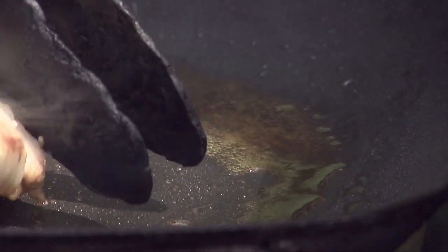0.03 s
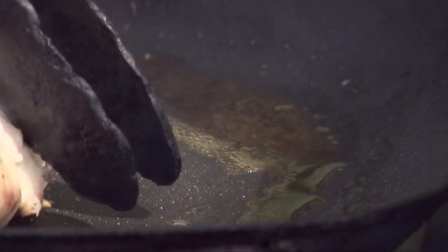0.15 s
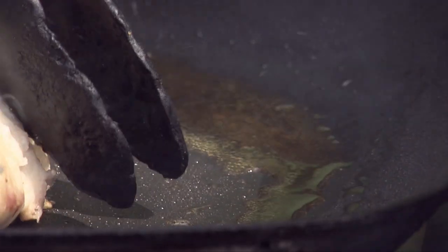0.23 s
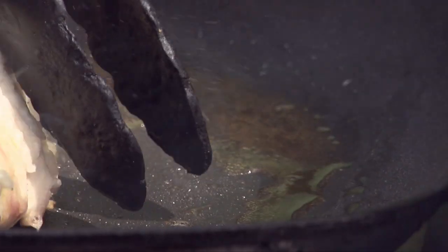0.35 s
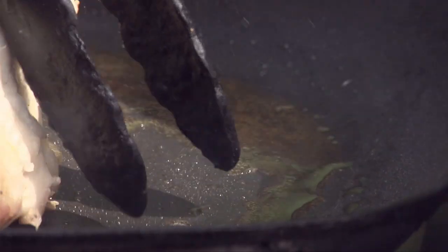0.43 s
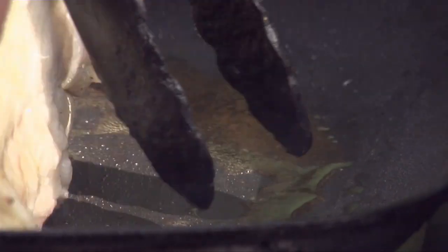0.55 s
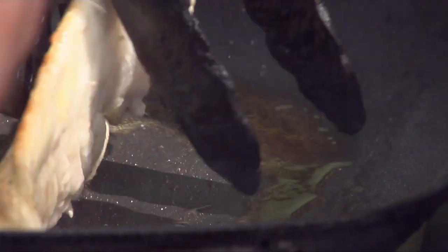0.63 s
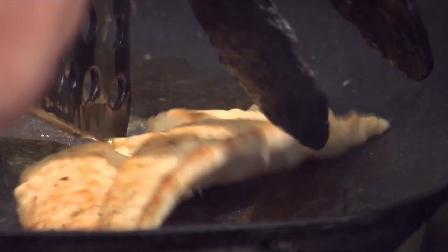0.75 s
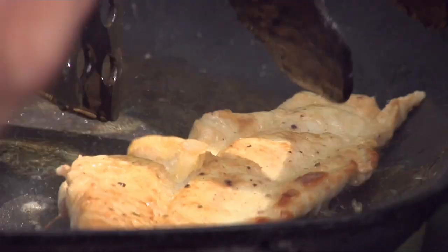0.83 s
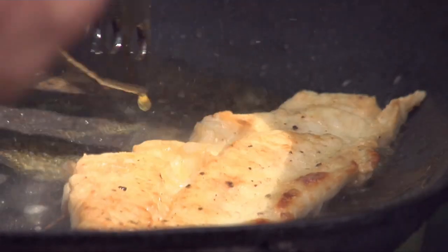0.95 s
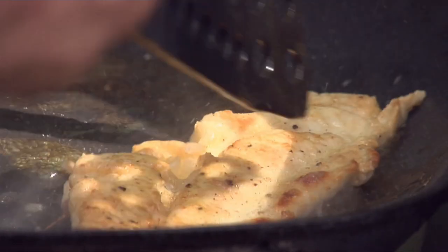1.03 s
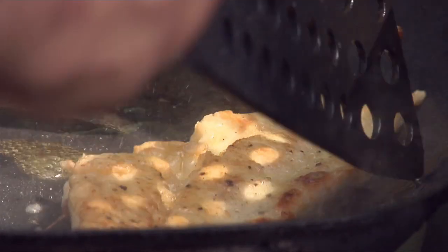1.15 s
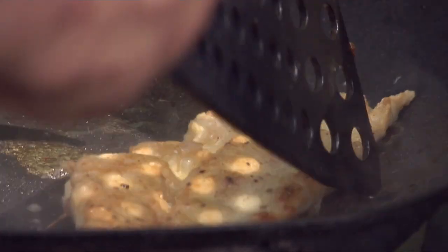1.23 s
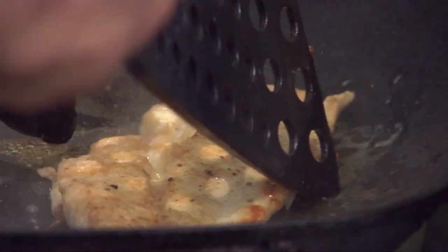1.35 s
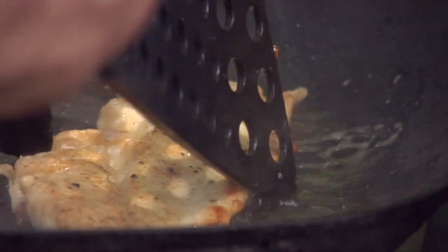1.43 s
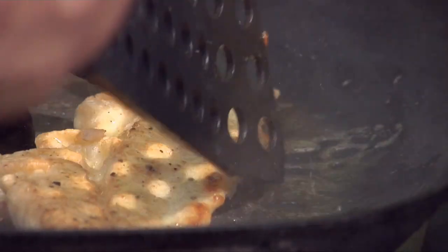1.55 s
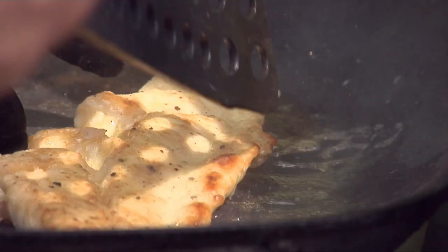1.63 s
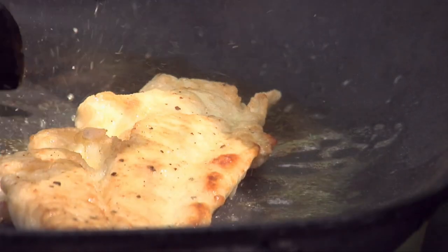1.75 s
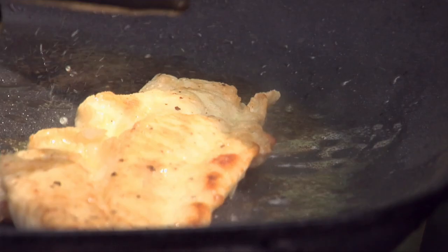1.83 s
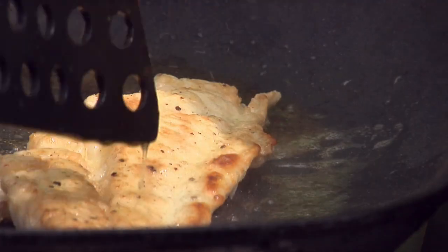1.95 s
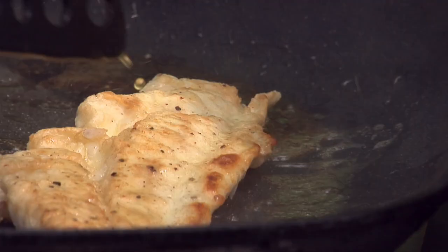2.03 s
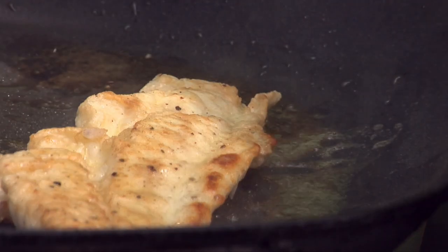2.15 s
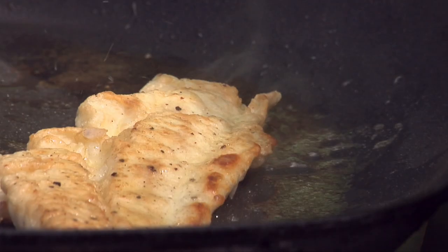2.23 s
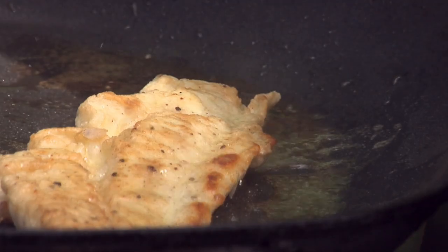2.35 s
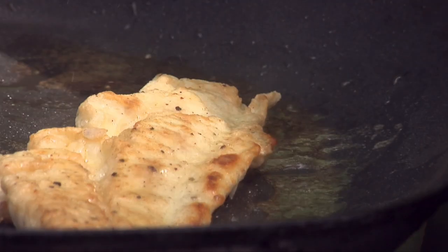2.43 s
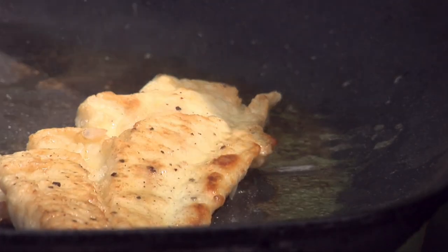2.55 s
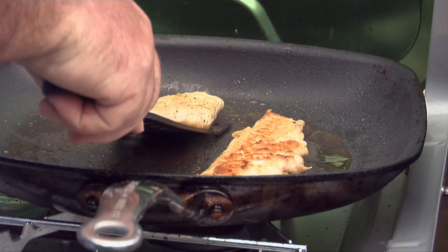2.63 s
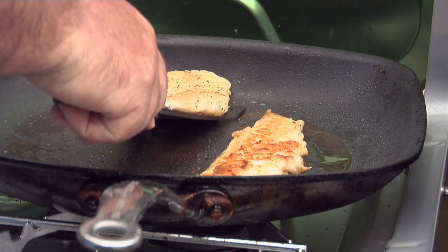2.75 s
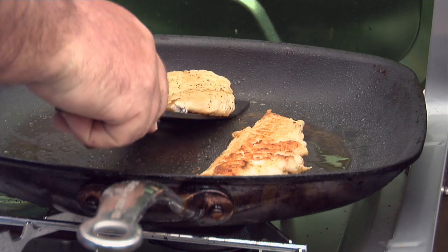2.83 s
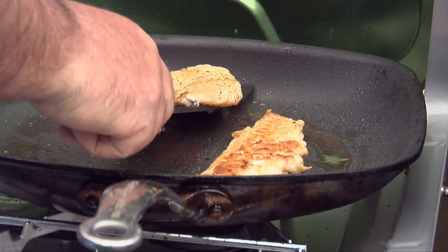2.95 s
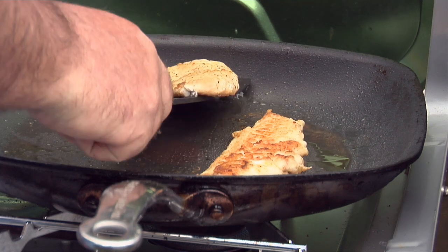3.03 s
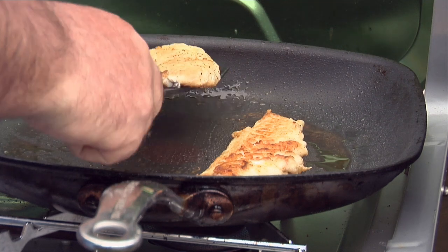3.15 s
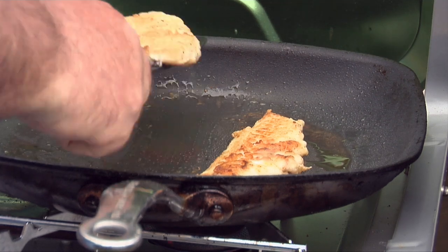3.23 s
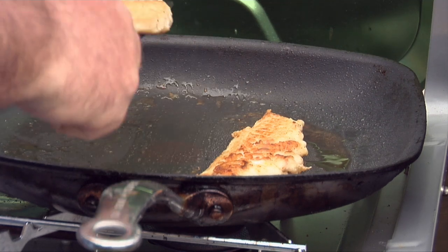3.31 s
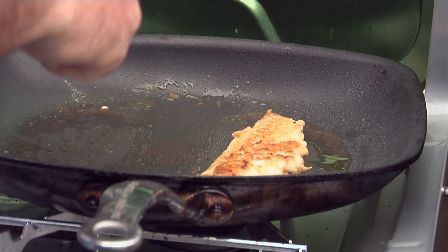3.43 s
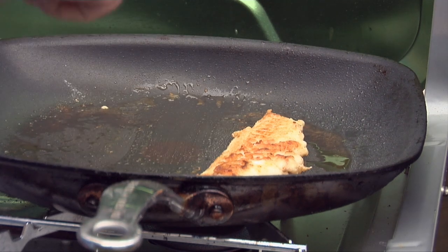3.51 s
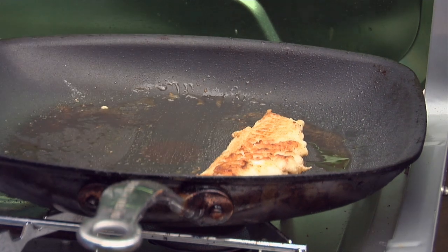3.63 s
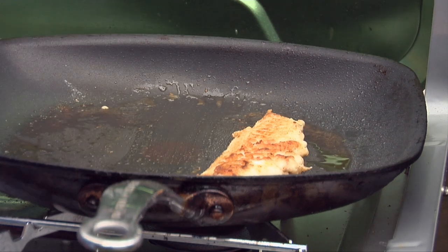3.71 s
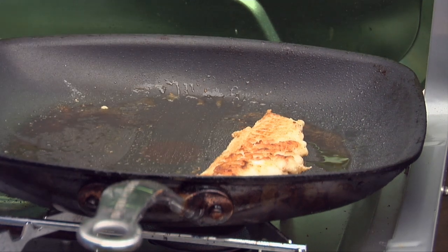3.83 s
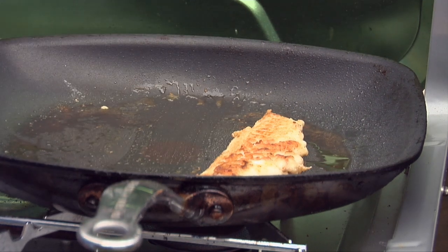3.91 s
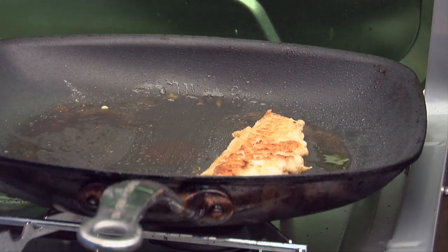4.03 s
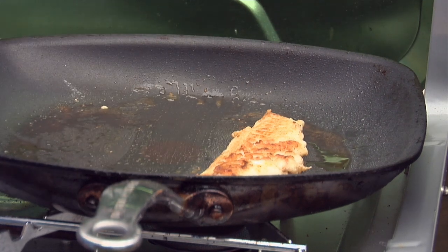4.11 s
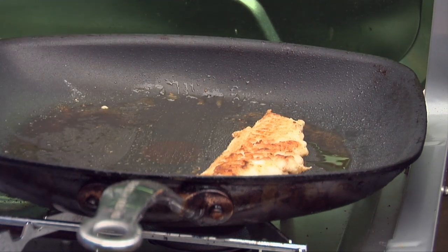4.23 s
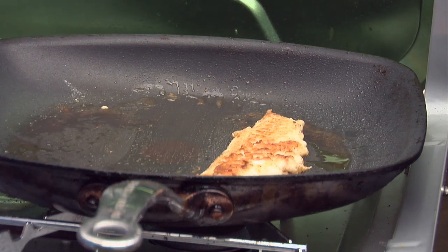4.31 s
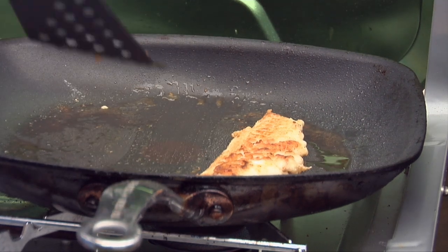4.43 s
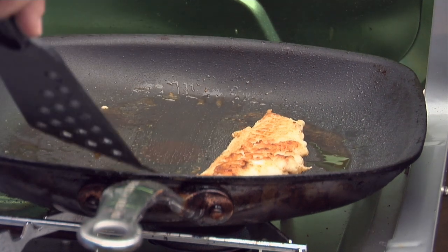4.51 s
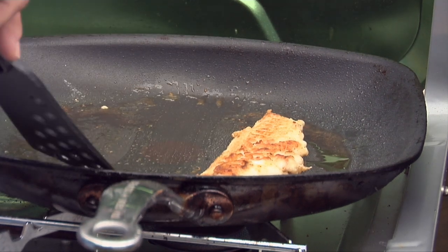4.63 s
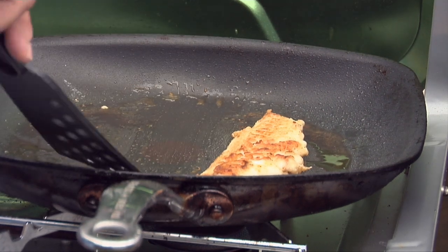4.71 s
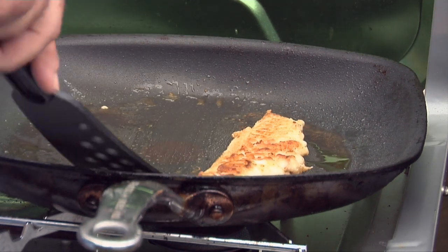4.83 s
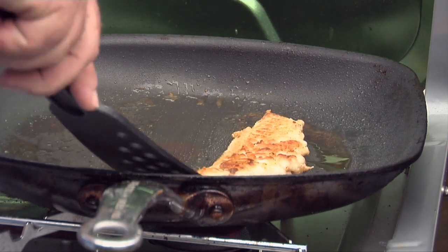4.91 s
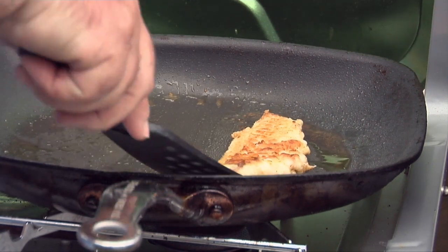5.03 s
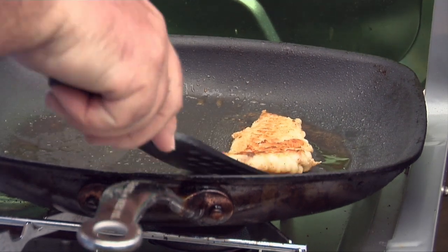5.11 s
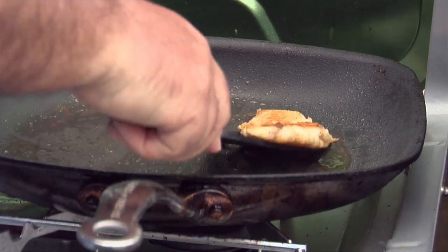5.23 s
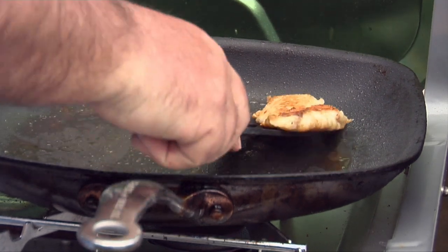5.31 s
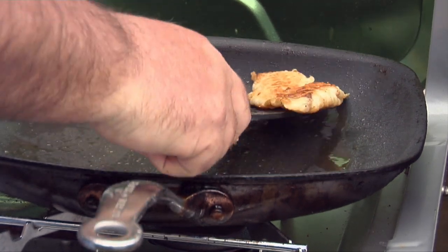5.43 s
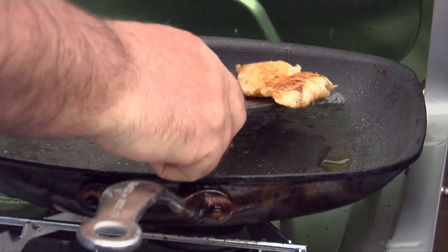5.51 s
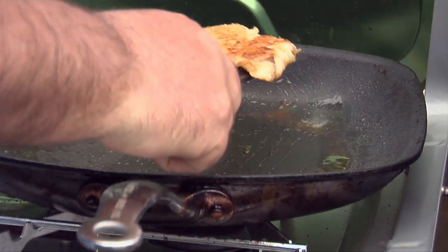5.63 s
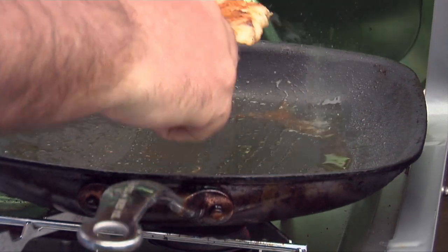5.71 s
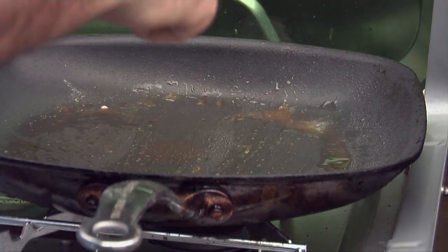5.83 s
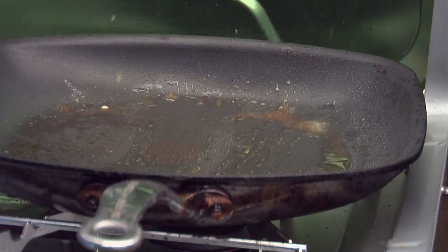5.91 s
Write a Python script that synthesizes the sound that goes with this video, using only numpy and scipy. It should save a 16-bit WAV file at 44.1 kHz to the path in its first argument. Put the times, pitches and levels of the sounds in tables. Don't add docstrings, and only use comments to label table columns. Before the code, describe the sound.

Close to a frying pan outdoors, thin sizzle and sharp pops swell within a second into a dense bright rush as fish meets hot fat, with thin steam whistles. At about 2.6 seconds the view jumps back: the burner is softer, and the sizzle thins into many separate snaps and ticks. Muffled traffic and low wind rumble sit behind. Loud pops briefly duck everything.

```python
import sys
import numpy as np
from scipy import signal
from scipy.fft import rfft, irfft, next_fast_len
from scipy.io import wavfile
from scipy.ndimage import uniform_filter1d, map_coordinates

SR = 44100
rng = np.random.default_rng(int(sys.argv[2]) if len(sys.argv) > 2 else 0)


def makeup_ratio(level_db):
    decades = np.asarray(level_db, float) / 20
    return 10 ** decades


def master(y):
    cut = np.clip(np.atleast_2d(y).T, -1, 1)
    pcm = np.round(cut * 32767)
    wavfile.write(sys.argv[1], SR, pcm.astype(np.int16))


N = 263277

# time in seconds, vigour in dB, brightness in dB.
FRYING = [(0, -37, -5), (0.2, -34.5, -6.5), (0.5, -30.5, -3.5), (0.7, -34, -3), (0.81, -32, -2),
          (1.0, -23.5, -5), (1.2, -24.5, -4.5), (1.8, -22.5, -6), (2.05, -25, -3), (2.35, -28, -6),
          (2.8, -26, -7.5), (3.08, -28.5, -5.5), (3.3, -31.5, -5.5), (4.1, -35, -3.5), (4.7, -33.5, -5),
          (5.25, -32, -4.5), (5.56, -31.5, -4), (5.97, -31, 1.5)]
# start in seconds, rise in dB,
# hold in seconds.
FLARES = [(0.285, 4, .06), (0.815, 5.5, .07), (2.43, 3, .13), (2.635, 3, .05), (2.86, 3, .16),
          (4.72, 3, .05), (4.86, 2.5, .03), (4.99, 2.5, .15), (5.265, 2.5, .09), (5.57, 6.5, .11),
          (5.84, 2.5, .1)]
# frequency in Hz, level in dB per Hz.
FIZZ_SPECTRUM = [(760, -27), (1300, -8), (1620, -3.5), (2210, -3.5), (2810, -5), (4720, 0), (6250, -0.5),
                 (6930, 1), (8270, -2), (12800, -4.5), (14500, -10), (15700, -10)]


def sizzle():
    vigour_db, bright_db = curves(FRYING)
    for start, rise_db, hold in FLARES:
        vigour_db = vigour_db + ramps(start, rise_db, attack=.015, hold=hold, release=.07)
    full_boil_db, share_per_db = -24, .03
    share = 0.2 + share_per_db * (full_boil_db - vigour_db) + 0.22 * far()
    share = np.clip(share, .05, .9)

    sway_db, far_fat_db = .6, -4.5
    fizz_db = vigour_db + far() * (far_fat_db + sway_db * wobble(8))
    spit_db = fizz_db + bright_db + sway_db * wobble(12)

    bed = patchy(1.6) * makeup_ratio(0.12 * wobble(24.95))
    crackle = grains(count=8000, centre_hz=8500, spread=0.47, cycles=1.2, scatter_db=7.0, clump=.35)
    ringing = grains(count=3000, centre_hz=5580, spread=0.306, cycles=10, scatter_db=5.5, clump=.4)
    bursts = unit(pan(crackle + 0.2 * ringing))
    fat = coloured(np.sqrt(1 - share) * unit(bed) + np.sqrt(share) * bursts, FIZZ_SPECTRUM)

    low = filtered(fat, lambda hz: 1 / (1 + (hz / 8000) ** 6))
    return makeup_ratio(fizz_db - 2.2) * unit(low) + makeup_ratio(spit_db + 1.33) * unit(fat - low)


def grains(count, centre_hz, spread, cycles, scatter_db, clump):
    u, t = rng.random((count, 2)), np.arange(160) / SR
    arrival = np.cumsum(np.exp(clump * (wobble(40) + wobble(150))))
    s = np.interp(u[:, 0], arrival / arrival[-1], np.arange(N) / SR)
    hz = np.clip(centre_hz * np.exp(spread * rng.standard_normal((count, 1))), 2800, 16000)
    size = makeup_ratio(-scatter_db * np.log(u[:, 1:] + .03))
    shapes = size * np.sin(2 * np.pi * hz * t) * np.exp(-t * hz / cycles)

    mean_power = uniform_filter1d(np.mean(abs(rfft(shapes, 512)) ** 2, axis=0), size=9)
    evening = (mean_power + 0.00086 * mean_power.max()) ** -.5
    grid = np.fft.rfftfreq(512, 1 / SR)
    return unit(filtered(place(s, shapes), lambda f: np.interp(f, grid, evening)))


# delay in seconds, level in dB.
PAN_ECHOES = [
    (.0006, -13),
    (.0014, -15),
    (.0023, -15),
    (.0037, -19),
    (.0058, -22),
]


def pan(x):
    echoes = sum(makeup_ratio(db) * np.pad(x, (round(s * SR), 0))[:N] for s, db in PAN_ECHOES)
    return x + echoes


# burst time in seconds, peak in dB, pitch in Hz.
POPS = [(0.4808, -16.5, 9580), (0.5456, -14, 3870), (0.6338, -17, 3840), (0.796, -19, 6740),
        (0.83, -12, 3500), (0.837, -13, 6130), (2.831, -20, 4270), (2.95, -14, 7360), (3.0765, -17.5, 3800),
        (3.1128, -23, 4030), (3.1609, -10.5, 7000), (3.259, -19, 6970), (3.339, -15, 6860),
        (3.458, -19.5, 9670), (3.6466, -18.5, 6540), (3.707, -21, 4700), (3.74, -17, 7780),
        (3.899, -23, 6600), (4.032, -23, 5300), (4.113, -16, 7000), (4.2721, -18, 6660),
        (4.4394, -21, 2600), (4.554, -17, 7320), (4.7633, -21, 4670), (5.274, -17, 3570),
        (5.309, -15, 4400), (5.3566, -20, 4240), (5.443, -16.5, 4260), (5.548, -22, 6310),
        (5.8965, -18.5, 6900)]
# burst time in seconds, pitch in Hz.
SPITS = [(0.173, 5340), (0.767, 7560), (2.5301, 7680), (2.9168, 7640), (3.0002, 5850), (3.037, 4400),
         (3.2954, 6500), (3.6817, 3820), (3.8112, 5000), (3.8534, 3850), (4.0515, 7260), (4.1733, 4250),
         (4.2033, 6830), (4.337, 5830), (4.4275, 5610), (4.4777, 8400), (4.5003, 4030), (4.6723, 5690),
         (4.7042, 4570), (4.7564, 4630), (4.874, 3950), (5.0974, 8800), (5.1602, 7550), (5.255, 4650),
         (5.376, 4340), (5.4066, 4560), (5.473, 3600), (5.5714, 6000), (5.616, 6230), (5.8212, 7150)]


def pops():
    small_pop_db, t60 = -21.5, .014
    small = [(s, small_pop_db, hz) for s, hz in SPITS]
    s, db, hz = np.transpose(list(POPS) + small)[:, :, None]
    t, f = np.arange(1024) / SR, np.fft.rfftfreq(1024, 1 / SR)
    noise = rng.standard_normal((len(s), 2, len(t)))
    swell = (1 - np.exp(-t / 0.0003)) * makeup_ratio(-60 * t / t60)
    spiky = noise[:, 0] * makeup_ratio(6.6 * noise[:, 1])
    splutter = rfft(spiky * swell)
    cavity = resonance(f, hz, 2300) + 0.5 * resonance(f, 6900, 7400)
    shapes = irfft(splutter * cavity / (1 + (f / 12500) ** 4))
    return place(s[:, 0], makeup_ratio(db + 3.5) * shapes / abs(shapes).max(axis=1, keepdims=True))


# time in seconds, peak in dB.
TICKS = [(0.5043, -12), (1.0646, -11), (2.6909, -16), (2.7419, -9), (2.8718, -15), (2.9178, -12),
         (3.0482, -12), (3.1187, -10), (3.2105, -15), (3.2957, -20), (3.4057, -17), (3.5295, -16),
         (3.6234, -13), (3.7772, -16), (3.8534, -17), (3.9879, -17), (4.0523, -19), (4.1552, -18),
         (4.2091, -16), (4.3376, -20), (4.4789, -19), (4.778, -14), (4.7882, -11), (4.8926, -10),
         (5.0987, -15), (5.1617, -16), (5.3776, -15), (5.6265, -10), (5.732, -15), (5.8372, -13)]
DROPLETS = [0.518, 0.582, 0.745, 2.6695, 2.7275, 2.7638, 2.8621, 2.8922, 2.971, 3.0563, 3.3215, 3.4423,
            3.4783, 3.5062, 3.6159, 3.77, 3.8293, 3.8698, 3.9967, 4.2498, 4.3076, 4.3529, 4.41, 4.4651,
            4.634, 4.679, 4.8837, 4.948, 5.176, 5.8793]


def ticks():
    snaps = np.array(POPS)[:, :2] + [.0013, 1]
    middling = [(s, -17.5) for s in DROPLETS]
    small = np.hstack(strays(count=140, level_db=-25.5))
    s, db = np.concatenate([TICKS, snaps, middling, small]).T[:, :, None]
    lead = .0002
    t = np.arange(40) / SR - lead
    hz = 10500 * np.exp(0.14 * rng.standard_normal(s.shape))
    cycle = np.sin(-2 * np.pi * hz * t) * np.exp(-(t * hz / 0.5) ** 2)
    size = makeup_ratio(db + 2.5) / abs(cycle).max(axis=1, keepdims=True)
    return pan(place(s[:, 0] - lead, size * cycle))


def strays(count, level_db):
    start, end = 2.65, 5.95
    u = rng.random((count, 2))
    return start + u[:, :1] * (end - start), level_db + 2.5 * np.log(u[:, 1:] + 0.033)


# start in seconds, peak in dB, pitch in Hz.
BUBBLES = [(0.0246, -23, 7570), (0.1344, -18.5, 4480), (0.2404, -19, 6360), (0.2994, -14, 6350),
           (0.3644, -20, 6780), (0.514, -15, 3340), (0.6075, -13, 3900), (0.7248, -18, 4070),
           (0.7951, -14, 6760), (0.8674, -15, 8900), (0.907, -13, 3470), (3.3446, -4, 2030),
           (3.981, -20, 4040), (3.9947, -24, 3820), (4.1344, -25, 3040), (4.44, -28, 2640),
           (4.5044, -27, 4020)]


def bubbles():
    s, db, hz = np.transpose(BUBBLES)[:, :, None]
    t = np.arange(2600) / SR
    large = hz < 2300
    t60 = np.where(large, .0035, .035)
    hz = np.where(large, 1.15 * hz, hz)
    wander = np.cumsum(0.18 * rng.standard_normal((len(s), len(t))), axis=1)
    ring = np.sin(2 * np.pi * hz * t + wander) * makeup_ratio(-60 * t / t60)
    onset = 1 - np.exp(-t / (0.079 * t60))
    return place(s[:, 0], makeup_ratio(db - 1.0) * ring * onset)


# start in seconds, length in seconds, pitch in Hz, bandwidth in Hz, level in dB.
JETS = [(0.001, .27, 3400, 350, -46), (0.001, .25, 7500, 400, -46), (0.001, .5, 10300, 700, -47),
        (.55, .3, 3760, 600, -43), (.7, .12, 6800, 600, -42), (.755, .08, 13000, 5000, -38),
        (.828, .05, 5500, 1500, -28), (1.1, .85, 7000, 450, -34.5), (1.35, .25, 5000, 300, -43),
        (1.2, .75, 2260, 250, -40), (4.44, .08, 8000, 4000, -41), (4.69, .11, 4650, 180, -42),
        (4.72, .09, 5770, 200, -45), (4.85, .045, 4000, 700, -41), (5.26, .11, 4650, 500, -40),
        (5.26, .12, 3600, 450, -41), (5.6, .12, 4100, 500, -42), (5.42, .32, 1950, 50, -52),
        (5.04, .16, 8000, 3500, -40), (5.58, .16, 8000, 4500, -32), (5.69, .04, 5800, 500, -38)]


def whistles():
    t, out = np.arange(N) / SR, np.zeros(N)
    for start, length, hz, width, db in JETS:
        swell = np.abs(np.sin(np.pi * np.clip((t - start) / length, 0, 1)) ** 0.25)
        hiss = filtered(rng.standard_normal(N), lambda f: resonance(f, hz, width) ** 2)
        out += makeup_ratio(db + 0.9 + 1.6 * wobble(35)) * swell * unit(hiss)
    return out


# time in seconds, level in dB.
BURNER = [(0, -27.5), (.45, -27.5), (1, -33.5), (1.9, -31), (2.15, -33), (2.6, -29), (2.78, -34.5),
          (3, -30.5), (3.9, -30.5), (4.6, -27), (5.1, -29), (5.6, -30), (5.97, -31)]
# frequency in Hz, level in dB per Hz.
FLAME_SPECTRUM = [(35, -65), (60, -32.5), (160, -11), (213, -1), (237, -1), (290, 0.5), (380, -11),
                  (465, -4), (660, -19.5), (715, -23), (988, -14), (1310, -22), (1500, -52), (1950, -58),
                  (3300, -120)]


def burner():
    far_burner_db = -12
    level_db = curves(BURNER)[0] + far_burner_db * far()
    return makeup_ratio(level_db + 1.8 + 0.9 * wobble(12)) * coloured(patchy(0.7), FLAME_SPECTRUM)


# nearest moment in seconds, rise in dB, half width in seconds.
PASSES = [
    (0.3, 3.5, 0.31),
    (1.7, 2.5, 0.29),
    (2.92, 5, 0.091),
    (4.4, 5, 0.64),
    (5.5, 2.5, 0.16),
]
# frequency in Hz, level in dB per Hz.
TRAFFIC_SPECTRUM = [(53, -49), (90, -13), (151, -3), (226, -3), (284, -1), (416, -2.5), (659, 1), (712, 3),
                    (1840, -5.5), (2180, -8), (3500, -12), (4550, -12), (7700, -120)]


def traffic():
    level_db = -40 + swells(PASSES)
    return makeup_ratio(level_db + 4.0 + 0.84 * wobble(12)) * coloured(patchy(0.63), TRAFFIC_SPECTRUM)


# centre in seconds, rise in dB, half width in seconds.
GUSTS = [
    (0, 30, .06),
    (1.71, 6, .1),
    (2.95, 24, 0.39),
    (3.7, 20.5, 0.33),
    (4.33, 25, 0.4),
    (5.2, 18, 0.33),
]
# frequency in Hz, level in dB per Hz.
WIND_SPECTRUM = [
    (10, -11),
    (25, -12),
    (40, -10),
    (65, -6.5),
    (110, -14),
    (200, -34.5),
]


def wind():
    calm_db = -73
    level_db = calm_db + swells(GUSTS)
    return makeup_ratio(level_db + 0.5 + 2.0 * wobble(7.6)) * coloured(rng.standard_normal(N), WIND_SPECTRUM)


def far():
    change_s = 2.635
    return np.clip((np.arange(N) / SR - change_s) / .02, 0, 1)


def resonance(f, hz, width):
    return 1j * f * width / (hz * hz - f * f + 1j * f * width)


def patchy(depth_db):
    z = signal.stft(rng.standard_normal(N), nperseg=512)[2]
    field = uniform_filter1d(rng.standard_normal(z.shape), 6, 0)
    field = uniform_filter1d(field, 8, 1)
    return signal.istft(z * makeup_ratio(depth_db * unit(field)), nperseg=512)[1][:N]


def coloured(x, spectrum):
    f, db = np.transpose(spectrum)
    return unit(filtered(x, lambda hz: makeup_ratio(np.interp(np.log(hz + 1), np.log(f + 1), db))))


def filtered(x, response):
    m = next_fast_len(N + 8192)
    return irfft(rfft(x, m) * response(np.fft.rfftfreq(m, 1 / SR)), m)[:N]


def unit(x):
    return x / np.sqrt(np.mean(x ** 2) + 1e-20)


def place(s, shapes):
    at = np.round(np.asarray(s) * SR).astype(int)[:, None] + np.arange(shapes.shape[1])
    return np.bincount(at.ravel(), shapes.ravel(), N + SR)[:N]


def curves(rows):
    s, *cols = np.transpose(rows)
    return [np.interp(np.arange(N) / SR, s, c) for c in cols]


def wobble(rate):
    knots = rng.standard_normal(int(N * rate / SR) + 4)
    return map_coordinates(knots, [np.arange(N) * rate / SR])


def swells(rows):
    t = np.arange(N) / SR
    return sum(db * np.exp(-((t - s) / width) ** 2) for s, db, width in rows)


def ramps(s, db, attack, hold, release):
    corners = np.cumsum([s, attack, hold, release])
    return np.interp(np.arange(N) / SR, corners, [0, db, db, 0])


# start in seconds, depth in dB, recovery in seconds.
CLAMPS = [
    (0.507, -6, 0.16),
    (3.118, -7.5, .25),
    (3.462, -4.5, 0.24),
    (4.565, -1.5, 0.081),
    (4.79, -1, 0.052),
    (4.893, -5, 0.25),
]


def gain_control():
    return makeup_ratio(sum(ramps(s, db, attack=0.0096, hold=0.052, release=back) for s, db, back in CLAMPS))


def scene():
    frying = sizzle() + pops() + ticks() + bubbles() + whistles()
    mono = frying + burner() + traffic() + wind()
    return np.array([mono, mono])


def low_pass(x):
    return signal.sosfilt(signal.butter(12, 17050, fs=SR, output="sos"), x)


def record(dry):
    held = dry[0] * gain_control()
    held = held / (1 + abs(held / .41) ** 4) ** (1 / 4)
    held = filtered(held, lambda hz: hz < 15760)
    return low_pass(np.array([held, held]))


dry = scene()
out = record(dry)
master(out)
```